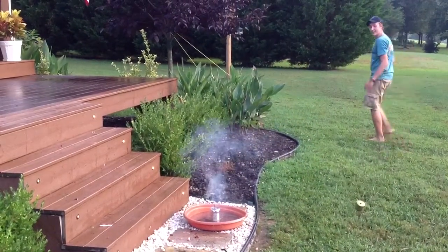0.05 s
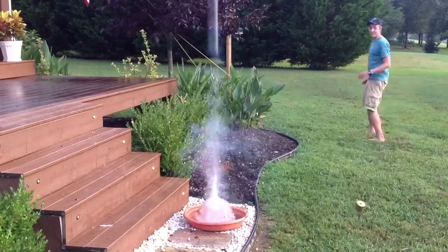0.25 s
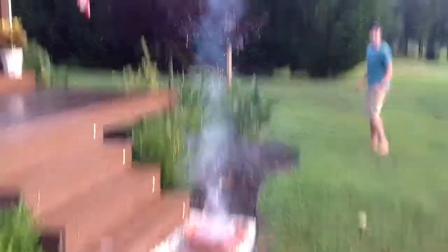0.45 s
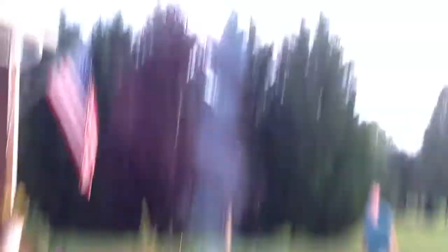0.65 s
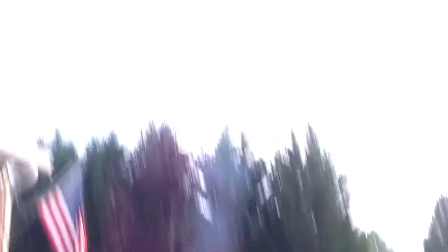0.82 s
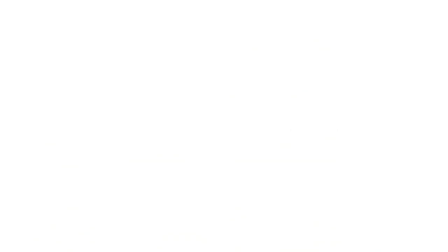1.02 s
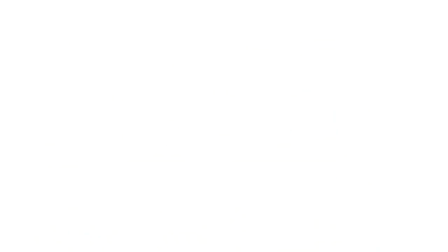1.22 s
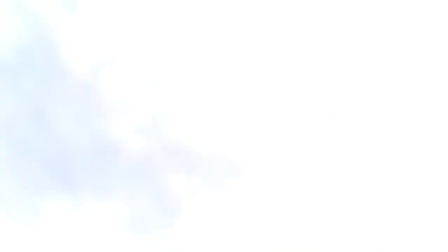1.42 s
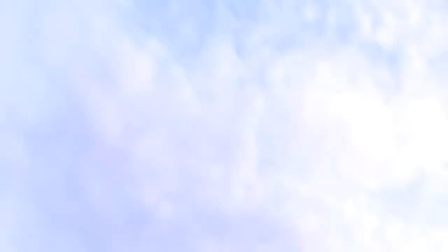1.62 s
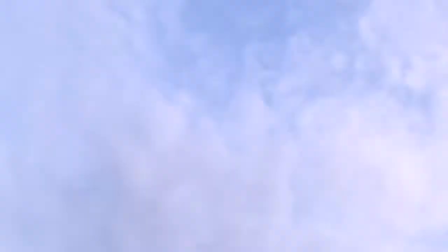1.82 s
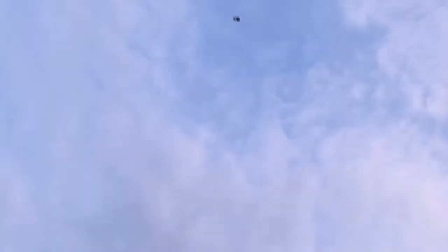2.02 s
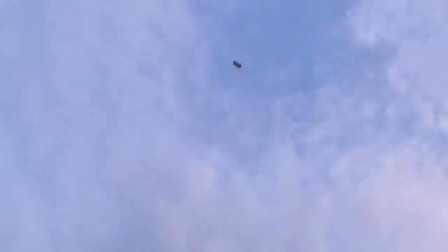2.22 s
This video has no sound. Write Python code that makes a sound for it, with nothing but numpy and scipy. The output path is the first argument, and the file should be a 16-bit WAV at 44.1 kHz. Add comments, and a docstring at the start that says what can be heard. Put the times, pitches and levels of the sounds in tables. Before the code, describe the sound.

A firecracker bangs under a tin can in a tub of water at about 0.2 seconds, a sharp crack with a hollow thump. The can rings briefly and the backyard echoes. Much quieter spray patters down around 0.6 seconds, then scattered drops slap and plop until 1.5 seconds. Faint buzzing insects and a distant hum dip at the bang and creep back until the end, near 2.3 seconds.

```python
"""Insects buzz over a distant hum in a backyard. A few metres away a firecracker goes off under a
tin can in a tub of water: a crack, then the hollow thump of the air in can and tub.
The automatic gain ducks at the bang; the yard echoes and the can rings as it flies.
Spray and drops fall back while the gain creeps up again."""
import sys
import numpy as np
from scipy import signal
from scipy.fft import rfft, irfft
from scipy.io import wavfile
from scipy.ndimage import uniform_filter1d

SR = 44100
rng = np.random.default_rng(int(sys.argv[2]) if len(sys.argv) > 2 else 0)


def inscribe(sig):
    """Save sig as 16-bit PCM at rate SR to the path in sys.argv[1].

    A 1-D sig is mono; a 2-D sig holds one channel per row.
    Samples are clipped to [-1, 1] before scaling.
    """
    pcm = np.round(np.clip(np.atleast_2d(sig).T, -1, 1) * 32767)
    wavfile.write(sys.argv[1], SR, pcm.astype(np.int16))


N = 103635
BANG_S = 0.2358

# Treble spectrum of a drop impact. Each row: frequency in Hz, relative level in dB.
DROP_TREBLE = [(1500, -18), (5000, -2.5), (7800, 2.5), (11000, -1.5), (14000, 0.5), (15500, -6)]


def undb(db):
    """Decibels to gain."""
    return 10 ** (np.asarray(db) / 20)


def times():
    """Sample times in seconds."""
    return np.arange(N) / SR


def unit(x):
    """Scale to rms 1."""
    return x / np.sqrt(np.mean(x ** 2))


def colour(x, spectrum):
    """Shape by (Hz, dB) points; rms 1."""
    hz, db = np.array(spectrum, float).T
    bins_hz = np.maximum(np.fft.rfftfreq(N, 1 / SR), 1)
    gain = undb(np.interp(np.log(bins_hz), np.log(hz), db))
    return unit(irfft(rfft(x) * gain, N))


def noise(spectrum):
    """Coloured noise; rms 1."""
    return colour(rng.standard_normal(N), spectrum)


def band(hz, width_hz):
    """Noise in one steep resonance; rms 1."""
    b, a = signal.iirpeak(hz, hz / (1.5 * width_hz), fs=SR)
    return unit(signal.lfilter(b, a, signal.lfilter(b, a, rng.standard_normal(N))))


def drift(rate_hz):
    """Smooth random drift; rms near 1."""
    step = max(int(SR / rate_hz), 1)
    stairs = np.repeat(rng.standard_normal(N // step + 1), step)
    return unit(uniform_filter1d(stairs, step))[:N]


def grains(per_s, scatter_db):
    """Random clicks of uneven size."""
    hits = rng.random(N) < per_s / SR
    return hits * rng.standard_normal(N) * undb(scatter_db * rng.exponential(size=N))


def burst(start_s, t60_s, hold_s=0, rise_s=0.0001):
    """Linear attack, hold, exponential release."""
    age_s = np.maximum(times() - start_s, 0)
    decay = np.log(1000) * np.maximum(age_s - hold_s, 0) / t60_s
    return np.minimum(age_s / rise_s, 1) * np.exp(-np.minimum(decay, 100))


def swell(peak_s, spread_s):
    """Gaussian rise and fall."""
    return np.exp(-((times() - peak_s) / spread_s) ** 2)


def mode(start_s, hz, db, t60_s, rise_s):
    """One damped sine."""
    tone = np.sin(2 * np.pi * hz * (times() - start_s))
    return undb(db) * burst(start_s, t60_s, rise_s=rise_s) * tone


def no_bass(x, cut_hz=150):
    """Low cut: removes deep bass from the thump and its echoes."""
    return signal.sosfilt(signal.butter(4, cut_hz, "high", fs=SR, output="sos"), x)


def background():
    """A wavering distant machine hum, a soft low-mid rush and outdoor air."""
    # Each row: time in seconds, level in dB.
    hum_levels = [(0, -62), (.5, -60), (.95, -59.5), (1.1, -55.5), (1.7, -57.5), (2.35, -56.5)]
    rush_levels = [(0, -68.5), (1.0, -76.5), (1.2, -57), (1.45, -61.5), (1.9, -67.5), (2.35, -87)]
    # Each row: frequency in Hz, relative level in dB.
    air_spectrum = [(25, -33.5), (60, -28), (100, -6), (135, -3), (230, -0.5), (400, -5.5), (750, -13),
                    (1300, -18.5), (2300, -22.5), (8000, -26), (15000, -27)]
    hum_hz = 120.8 * (1 + 0.0031 * drift(6.7))
    hum = np.sqrt(2) * np.sin(2 * np.pi * np.cumsum(hum_hz) / SR)
    hum *= undb(np.interp(times(), *np.array(hum_levels).T) + 0.98 * drift(28))
    rush = band(hz=494, width_hz=210) * undb(np.interp(times(), *np.array(rush_levels).T))
    air = noise(air_spectrum) * undb(-56 + 0.7 * drift(3))
    return hum + rush + air


def insects():
    """A broad rasping chorus and a narrower, higher buzz that slowly fades."""
    # Each row: frequency in Hz, relative level in dB.
    chorus_spectrum = [(2000, -28.5), (2550, -18), (2900, -6.5), (3350, -2.5), (3950, -3), (4600, 0),
                       (5200, -4.5), (5800, -10), (7000, -26), (7350, -15.5), (8200, -33.5)]
    chorus = noise(chorus_spectrum) * undb(-51 + 0.65 * drift(11) + 0.69 * drift(400))
    fade_db_per_s = 0.95
    buzz = band(hz=6245, width_hz=370) * undb(-55 - fade_db_per_s * times() + 0.8 * drift(17))
    return chorus + buzz


def spray():
    """Spray falls back as a dense patter: quick rise, slower fall."""
    # Each row: frequency in Hz, relative level in dB.
    spectrum = [(60, -40), (250, -6.5), (600, 2), (1200, -0.5), (2000, -2.5), (4000, -3), (8000, -6.5),
                (12500, -6), (15000, -11)]
    peak_s, rise_s, fall_s = 0.569, 0.03, 0.19
    age_s = times() - peak_s
    envelope = np.exp(np.where(age_s < 0, age_s / rise_s, -age_s / fall_s))
    return undb(-49) * envelope * colour(grains(per_s=7800, scatter_db=0.67), spectrum)


def drops():
    """Single drops slap down nearby or plop into water and soil."""
    # Each row: frequency in Hz, relative level in dB.
    body_spectrum = [(80, -33.5), (300, -20), (650, -8), (830, 14), (1150, -14), (1650, 7), (2600, -1),
                     (6000, -16), (12000, -25)]
    # Each row: start in seconds, treble level in dB, body level in dB.
    slap_hits = [(.613, -41, -69), (.724, -47, -70), (1.0538, -36, -41.5), (1.073, -45, -75.5),
                 (1.095, -51, -70), (1.202, -44, -67), (1.244, -52, -67), (1.2705, -39.5, -68),
                 (1.292, -48, -67), (1.303, -47, -68), (1.318, -46.5, -64), (1.4948, -41.5, -56)]
    # Each row: start in seconds, frequency in Hz, level in dB.
    plop_hits = [(.581, 1160, -44), (.605, 1160, -43), (0.657, 2317, -52), (0.827, 1300, -39),
                 (.828, 430, -46), (0.885, 2350, -44.5)]
    treble = noise(DROP_TREBLE) * undb(2.4 * drift(830))
    body = noise(body_spectrum)
    slaps = sum((undb(treble_db) * treble + undb(body_db) * body) * burst(start_s, t60_s=0.021)
                for start_s, treble_db, body_db in slap_hits)
    plops = sum(undb(db) * band(hz, 0.17 * hz) * burst(start_s, t60_s=0.02, rise_s=0.00064)
                for start_s, hz, db in plop_hits)
    return slaps + plops


def splash():
    """The main splash lands: a short, rough midrange swell."""
    envelope = undb(-52 + 2.4 * drift(200)) * swell(peak_s=0.588, spread_s=0.035)
    return envelope * band(hz=1300, width_hz=720)


def drizzle():
    """Fine droplets tick down in brief showers."""
    # Each row: peak time in seconds, spread in seconds, level in dB.
    showers = [(.49, .05, -63), (.7, 0.083, -61), (.93, .05, -66), (1.28, 0.08, -60.5),
               (1.46, 0.085, -63.5)]
    envelope = sum(undb(db) * swell(peak_s, spread_s) for peak_s, spread_s, db in showers)
    return envelope * colour(grains(per_s=780, scatter_db=0.43), DROP_TREBLE)


def yard():
    """Scattered sound dies away, with a few distinct echoes and a faint long tail from the trees."""
    # Each row: frequency in Hz, relative level in dB.
    low_spectrum = [(50, -50), (110, -23), (170, 1), (300, 2), (400, -2), (520, 5.5), (800, -11.5),
                    (1100, -20), (1500, -18.5), (2200, -33), (5000, -56.5)]
    high_spectrum = [(700, -29), (1400, -6.5), (1950, -11.5), (2250, -5.5), (2550, -14), (2900, 2.5),
                     (4200, -3.5), (6500, -4.5), (9000, -2.5), (12000, -1.5), (15000, -4)]
    far_spectrum = [(100, -25), (190, -1), (600, 6), (1000, -8), (2000, -4.5), (4000, -20), (8000, -22),
                    (15000, -24)]
    echo_spectrum = [(60, -45.5), (180, -0.5), (340, 2.5), (550, 0.5), (900, -10.5), (2000, -26.5),
                     (4000, -20.5), (15000, -32.5)]
    # Deck, house and trees. Each row: delay in seconds, level in dB, T60 in seconds.
    reflections = [(0.019, -12.5, 0.05), (0.049, -19, 0.037), (0.094, -33, 0.07), (0.154, -35, 0.042)]
    low = undb(-14 + 1.5 * drift(91)) * noise(low_spectrum) * burst(BANG_S, t60_s=0.3, rise_s=0.048)
    high = undb(-19 + 1.2 * drift(250)) * noise(high_spectrum) * burst(BANG_S, t60_s=0.28, rise_s=0.004)
    far = undb(-43.5) * noise(far_spectrum) * burst(BANG_S, t60_s=1.44, rise_s=0.36)
    echoes = sum(undb(db) * burst(BANG_S + delay_s, t60_s, hold_s=0.0034, rise_s=0.0016)
                 for delay_s, db, t60_s in reflections) * noise(echo_spectrum)
    hollow_echo = mode(start_s=0.384, hz=550, db=-35, t60_s=0.17, rise_s=0.011)
    return no_bass(low + echoes) + high + far + hollow_echo


def can_ring():
    """The can's wall rings; clusters of close modes shimmer on as it flies."""
    # Each row: frequency in Hz, level in dB, T60 in seconds.
    wall_modes = [(2342, -12.5, .019), (2930, -3.5, 0.022), (3915, -14.5, .06), (4507, -16, 0.028),
                  (5410, -10.5, .018), (6400, -15.5, .02), (11150, -13.5, .03), (12050, -10.5, .05)]
    # Each row: centre in Hz, width in Hz, level in dB, T60 in seconds.
    clusters = [(2900, 220, -35, 0.48), (3895, 150, -33, 0.25), (7450, 400, -31, .28),
                (12230, 700, -28, .33)]
    wall = sum(mode(BANG_S, hz, db, t60_s, rise_s=0.0014) for hz, db, t60_s in wall_modes)
    shimmer = sum(undb(db) * band(hz, width_hz) * burst(BANG_S, t60_s, rise_s=0.0027)
                  for hz, width_hz, db, t60_s in clusters)
    return wall + shimmer


def thump():
    """The air in can and tub resonates; the low notes come late."""
    # Each row: frequency in Hz, relative level in dB, T60 in seconds, delay in seconds.
    air_modes = [(237, -0.5, 0.021, .0023), (517, 1, 0.025, 0.00302), (961, -5, 0.021, 0.00098),
                 (1318, -5, 0.014, .00016), (1595, -7, 0.014, 0.00013)]
    cavity = sum(mode(BANG_S + delay_s, hz, db, t60_s, rise_s=0.0018)
                 for hz, db, t60_s, delay_s in air_modes)
    return no_bass(-undb(10.5) * cavity)


def crack():
    """The charge explodes: a short, bright noise burst."""
    # Each row: frequency in Hz, relative level in dB.
    spectrum = [(40, -15.5), (300, -15), (1100, -17), (1950, -14), (2250, 1.5), (2580, -16.5), (2950, 2.5),
                (3600, -7.5), (4300, -7.5), (5100, -7), (6300, -2), (8700, -5.5), (11500, -1),
                (15000, -2.5)]
    return undb(-4) * noise(spectrum) * burst(BANG_S, t60_s=0.029, hold_s=0.0042)


def scene():
    """Mono sum at the microphone."""
    bang = crack() + thump() + can_ring() + yard()
    water = spray() + drops() + splash() + drizzle()
    return (bang + water + insects() + background())[None]


def record(dry):
    """Gain control ducks on loud sound and recovers slowly; peaks are rounded and the top is cut."""
    threshold_db, window_s, release_s, top_hz = -11.5, 0.0072, 0.89, 15200
    power = uniform_filter1d(dry[0] ** 2, int(window_s * SR))
    over_db = np.maximum(10 * np.log10(np.maximum(power, 1e-12)) - threshold_db, 0)
    release = np.exp(-times() / release_s)
    duck_db = np.maximum.accumulate(over_db / release) * release  # decaying peak hold
    rounded = np.tanh(dry * undb(-duck_db))
    return signal.sosfilt(signal.ellip(10, 0.2, 80, top_hz, fs=SR, output="sos"), rounded)


dry = scene()
out = record(dry)
inscribe(out)
```